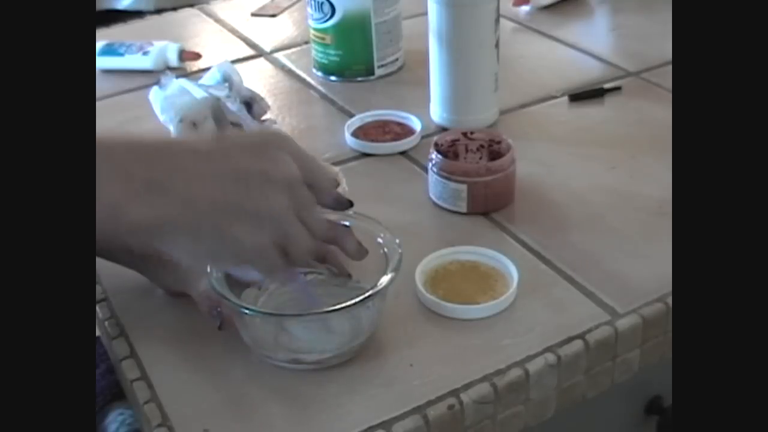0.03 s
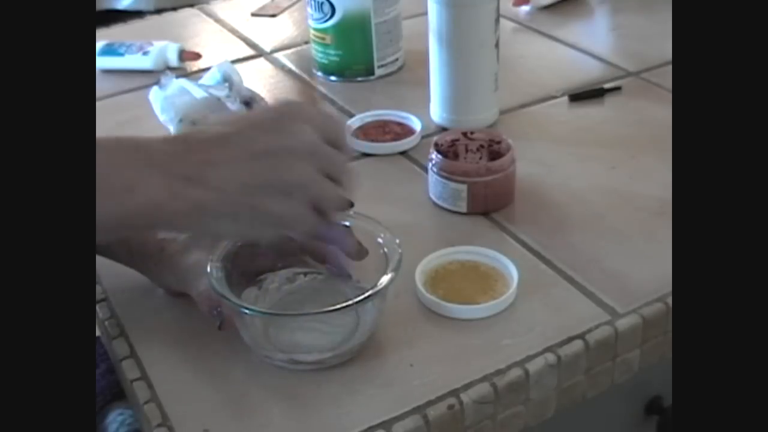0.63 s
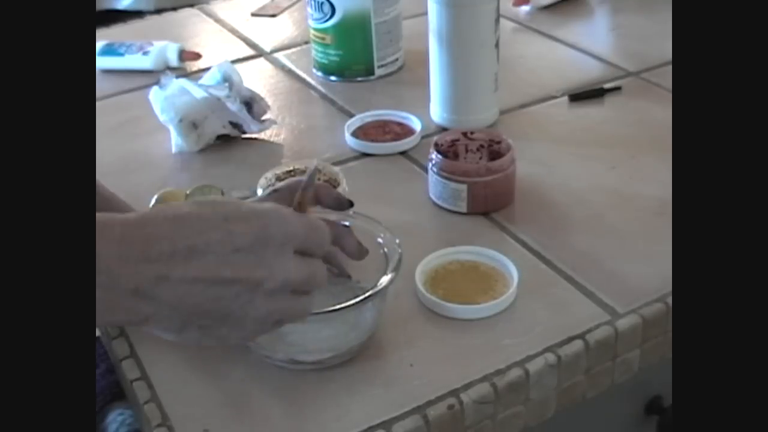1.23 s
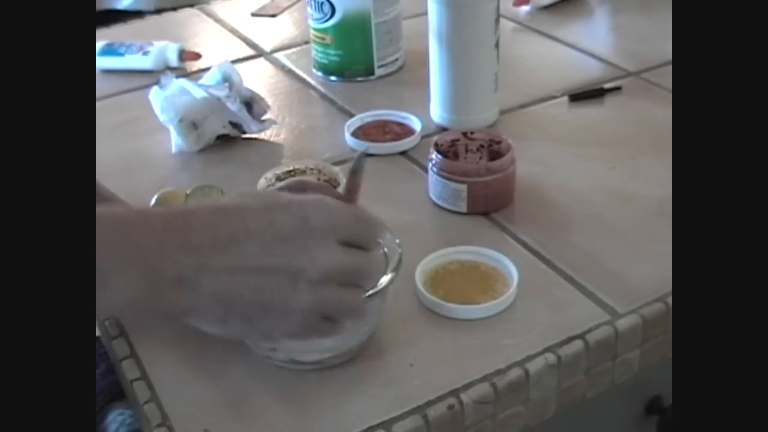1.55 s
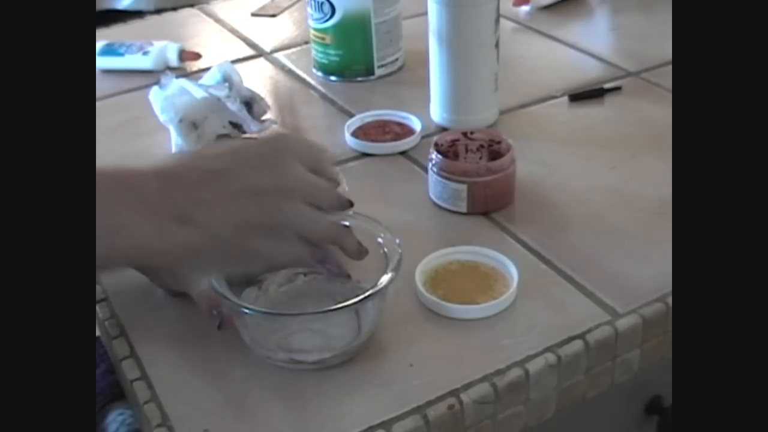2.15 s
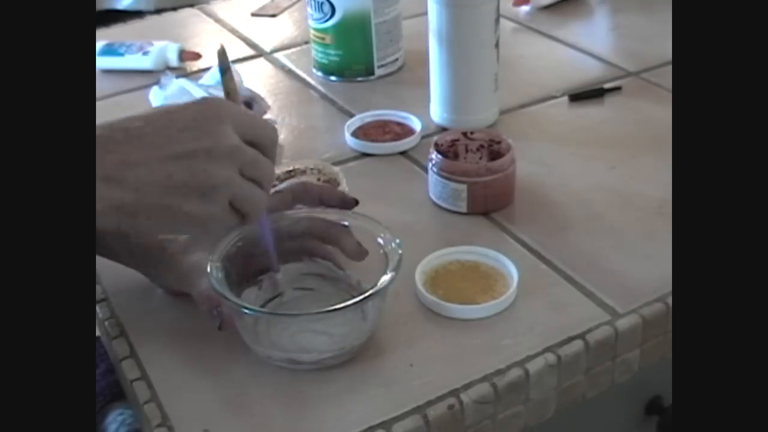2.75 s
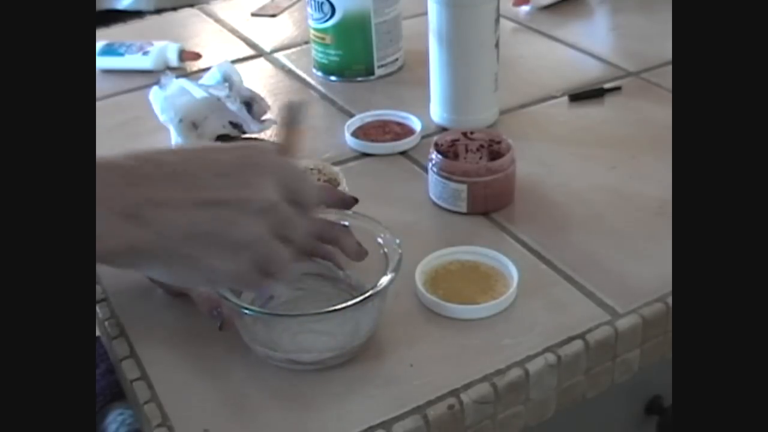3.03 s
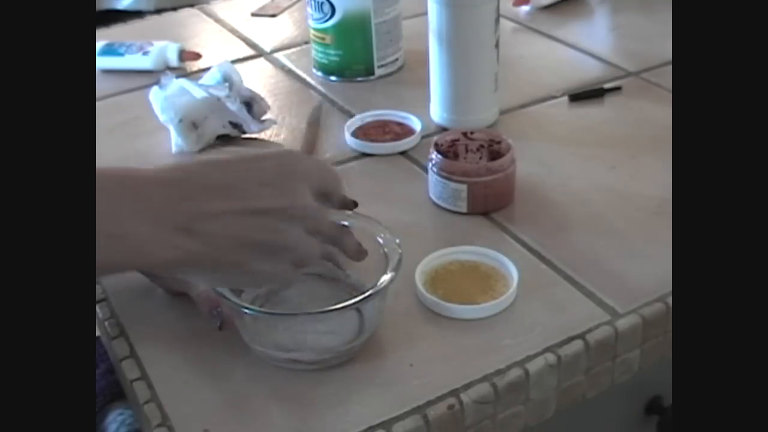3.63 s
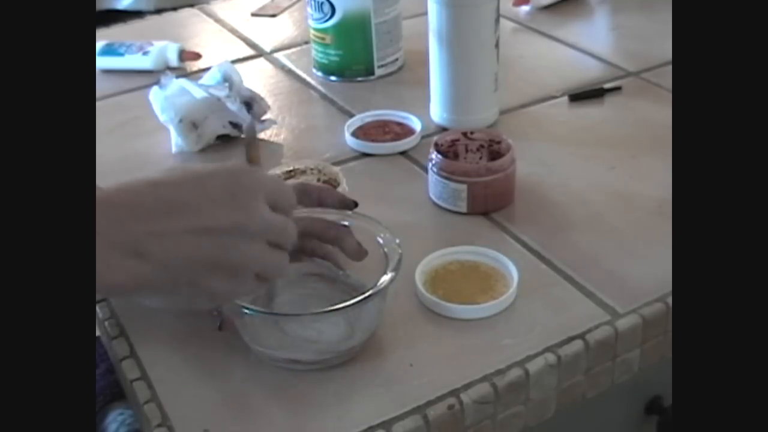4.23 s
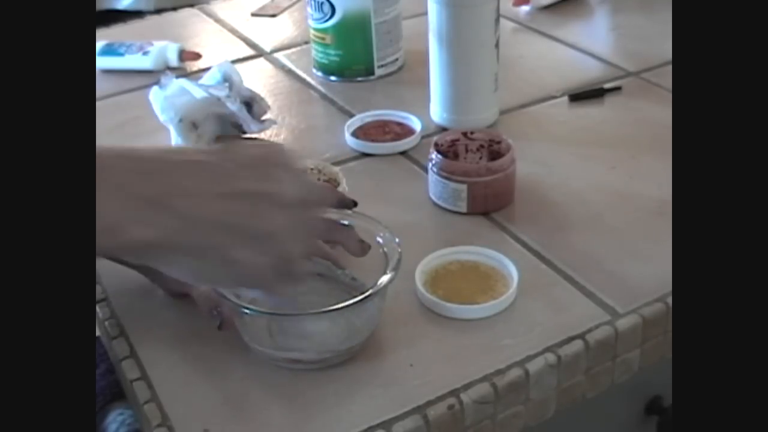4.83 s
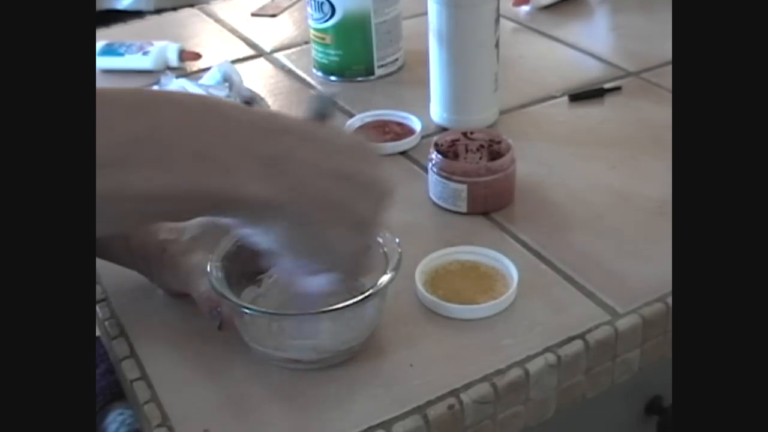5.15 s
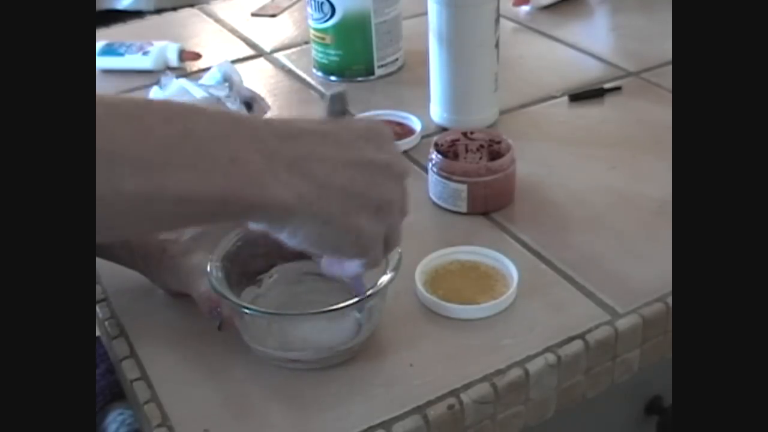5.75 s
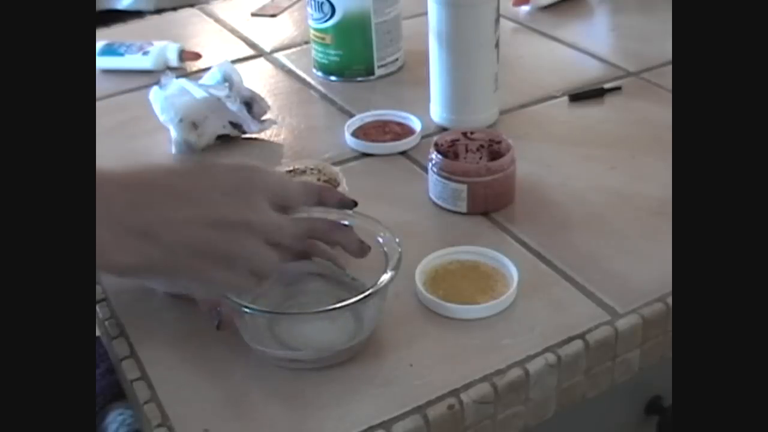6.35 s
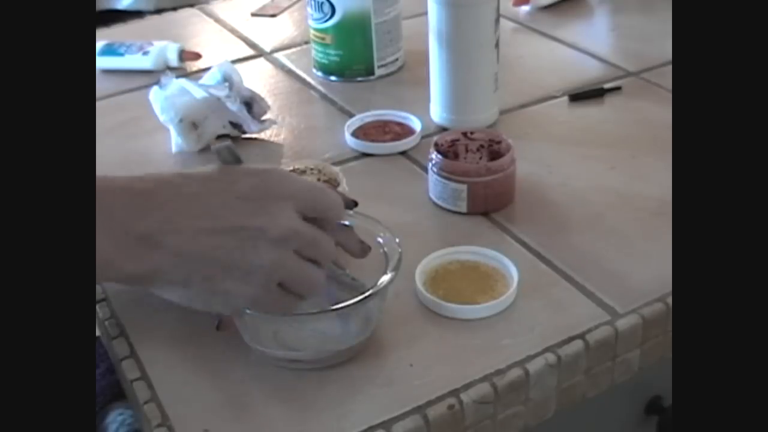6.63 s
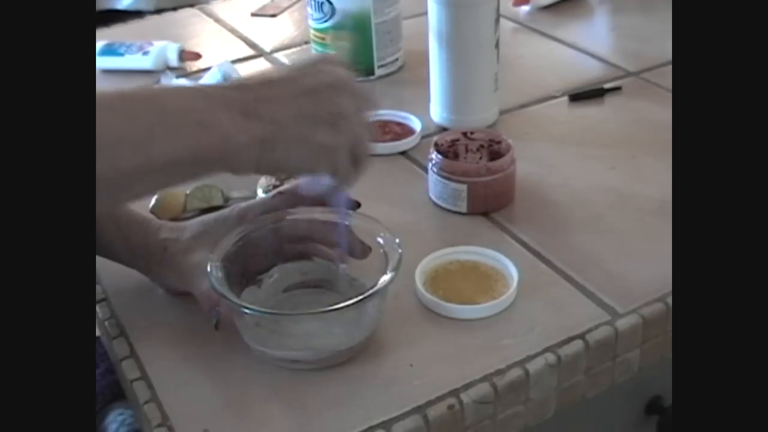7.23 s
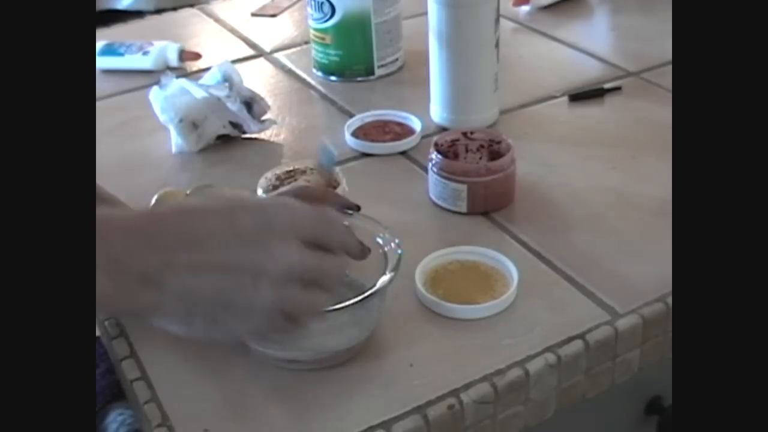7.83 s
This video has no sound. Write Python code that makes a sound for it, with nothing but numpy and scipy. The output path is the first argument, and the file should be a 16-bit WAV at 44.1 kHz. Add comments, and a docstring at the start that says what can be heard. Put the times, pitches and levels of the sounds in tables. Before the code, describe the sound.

Quiet, sticky stirring in a glass bowl that knocks unevenly on a tiled counter, the brush handle rubbing and ticking against the glass.

```python
"""A brush handle stirs thick glue in a small glass bowl held on a tiled counter.
Friction and impacts excite the modes of the bowl: it rocks, knocks dully and skids on the tile,
while the handle rubs, ticks and squeaks on the glass. In the paste, threads snap and air pockets
resonate in pops and smacks. A small hard room reflects it all, over a soft hiss and the thin
whine of a camera motor."""
import sys
import numpy as np
from scipy import signal
from scipy.fft import rfft, irfft, next_fast_len
from scipy.io import wavfile

SR = 44100
rng = np.random.default_rng(int(sys.argv[2]) if len(sys.argv) > 2 else 0)


def wrap_up_sound(samples):
    """Save the sound to the file named by the first command line argument, as 16-bit audio."""
    columns = np.atleast_2d(samples).T
    # keep every value between -1 and 1, then stretch to whole-number steps
    tamed = np.clip(columns, -1, 1)
    steps = np.round(tamed * 32767).astype(np.int16)
    wavfile.write(sys.argv[1], SR, steps)


N = 348390
T = np.arange(N) / SR
ANTIPHASE = np.array([[1], [-1]])   # added on the left, subtracted on the right


def from_db(db):
    """Amplitude ratio of a level in decibels."""
    return 10 ** (np.asarray(db) / 20)


def rms_one(x):
    """Normalisation to unit rms."""
    return x / np.sqrt(np.mean(x ** 2) + 1e-20)


def at_level(sound, db):
    """Normalisation of a transient by the rms of its first 30 ms."""
    head = sound[..., :round(.03 * SR)]
    return from_db(db) * sound / np.sqrt(np.mean(head ** 2) + 1e-20)


def at_hz(points, hz):
    """Interpolation on a logarithmic frequency axis."""
    frequencies, values = np.transpose(points)
    return np.interp(np.log(hz), np.log(frequencies), values)


def add(track, s, sound):
    """Superposition of a sound on a track, starting at s seconds."""
    start = max(round(s * SR), 0)
    track[..., start:start + sound.shape[-1]] += sound[..., :N - start]


def band(x, low_hz, high_hz, order=3):
    """Causal band-pass filtering."""
    edges = [low_hz, min(high_hz, SR / 2 - 1000)]
    return signal.sosfilt(signal.butter(order, edges, "band", fs=SR, output="sos"), x + 1e-18)


def coloured(x, spectrum):
    """Spectral shaping, normalised to unit rms."""
    size = next_fast_len(N)
    hz = np.arange(size // 2 + 1) * SR / size + 1e-3
    shaped = rfft(x, size) * from_db(at_hz(spectrum, hz))
    return rms_one(irfft(shaped, size)[..., :N])


def drift(per_s):
    """Random modulation: straight lines join normally distributed values."""
    return np.interp(T * per_s, np.arange(N // 20), rng.standard_normal(N // 20))


def swell(t, rise_s):
    """Critically damped envelope, peaking at 1 after rise_s."""
    u = t / max(rise_s, .0002)
    return u * np.exp(1 - u)


def grains(per_s, spread_db, size):
    """Shot noise: random impulses of uneven height."""
    heights = from_db(spread_db * np.minimum(rng.exponential(1, size), 4)) * rng.choice([-1, 1], size)
    return heights * (rng.random(size) < per_s / SR)


def now_and_then(per_s):
    """Jittered timing, one event per interval: (time [s], random value [0-1])."""
    offsets, chances = rng.random((100, 2)).T
    times = (np.arange(100) + offsets) / per_s
    return [(s, chance) for s, chance in zip(times, chances) if s < T[-1]]


def ring(force, modes, spread_db=0):
    """Modal superposition: a force drives damped resonators whose gains may vary at random."""
    out = 0
    for hz, db, t60 in modes:
        radius, angle = np.exp(-np.log(1000) / (t60 * SR)), 2 * np.pi * hz / SR
        feedback = [1, -2 * radius * np.cos(angle), radius ** 2]
        gain = from_db(db + spread_db * rng.standard_normal())
        out = out + gain * signal.lfilter([1, 0, -1], feedback, force + 1e-18)
    return out


def diffuse(t, t60, apart_hz):
    """A decaying diffuse field at two close points is coherent only in the bass."""
    mid, side = rng.standard_normal((2, len(t)))
    side = signal.lfilter(*signal.butter(1, apart_hz, "high", fs=SR), side)
    onset = np.clip(t / 0.0023 - .5, 0, 1)
    tail = np.array([mid + side, mid - side]) * np.exp(-np.log(1000) * t / t60) * onset
    return tail / np.linalg.norm(tail[0])


# Modes of bowl and counter together: (frequency [Hz], gain [dB], T60 [s])
BOWL_MODES = [(240.5, -4.5, 0.08), (408.5, -7, 0.057), (479, -10.5, 0.048), (575.5, -6, 0.048),
              (698, -6.5, 0.11), (802.7, 0, 0.094), (838, -8, 0.075), (932.6, -6, 0.1), (1125, 1.5, 0.035),
              (1257, -0.5, 0.033), (1456, -11.5, 0.07), (1557, -9.5, 0.024), (1667, 2, 0.029),
              (1990, -12, 0.041), (2254, -10.5, 0.083)]
BOWL_DETUNE = .022   # scale of the fractional shift in frequency


def loaded_modes():
    """Loading: the shifting grip and paste move each mode of the bowl a little."""
    return [(hz * (1 + BOWL_DETUNE * rng.uniform(-1.7, 1.7)), db, t60) for hz, db, t60 in BOWL_MODES]


# Strength of the stirring: (time [s], level [dB])
EFFORT = [(0.0, -48.5), (0.17, -56.5), (0.31, -54), (1.03, -52), (1.12, -51.5), (1.3, -68), (1.54, -57),
          (1.93, -59.5), (2.18, -55), (2.4, -60), (2.7, -69.5), (2.84, -63.5), (3.45, -63), (3.72, -54),
          (3.87, -51), (4.82, -57), (5.15, -63.5), (5.99, -63), (6.14, -51), (6.25, -49), (6.36, -50),
          (6.91, -53.5), (7.13, -65.5), (7.41, -61.5), (7.57, -43), (7.64, -61), (7.8, -46.5), (7.9, -56)]


def effort(s):
    """The driving level of the hand at a time, in dB."""
    return np.interp(s, *np.transpose(EFFORT))


def rubbing(slips_per_s=600, pops_per_s=110, pop_cycles=14):
    """Frictional excitation: the dragged handle shakes the bowl's modes and frees tiny air pockets."""
    grip = from_db(effort(T) + 1.5 * drift(35))
    slips = np.array([grains(slips_per_s, 3.75, N), grains(slips_per_s, 4.2, N)])
    # Modes come and go as the tip travels, and waver in pitch as the load shifts.
    shaken = sum(ring(slips * from_db(2.0 * drift(22)), [mode]) for mode in BOWL_MODES)
    warped_time = (T + np.cumsum(BOWL_DETUNE * drift(45)) / SR) % T[-1]
    mid = rms_one(band(np.interp(warped_time, T, shaken[0]), 250, 1270))
    side = rms_one(band(np.interp(warped_time, T, shaken[1]), 600, 1270))
    bowl = mid + from_db(-5.5) * side * ANTIPHASE
    pitches = np.geomspace(420, 1450, 14)
    tiny_pops = sum(ring(grains(pops_per_s / len(pitches), 2.6, N), [(hz, 0, pop_cycles / hz)])
                    for hz in pitches)
    return grip * (from_db(-3.5) * bowl + from_db(-9.5) * rms_one(tiny_pops))


def swish(s, usual_db=-66.5, usual_effort_db=-54.5):
    """Power law: the level of the paste follows 0.4 dB for each dB of effort."""
    return usual_db + 0.4 * (effort(s) - usual_effort_db)


def small_pockets(per_s=4.0, low_hz=2200, high_hz=5100, tear_s=0.0042):
    """Cavities of random resonance give faint smacks that grow with the swish; rows as in SMACKS."""
    return [(s, swish(s) - 0.5, low_hz * (high_hz / low_hz) ** chance, tear_s)
            for s, chance in now_and_then(per_s)]


# Colour of the snapping paste: (frequency [Hz], gain [dB])
PASTE_SPECTRUM = [(1200, 18.5), (2000, 1.5), (3000, 5.5), (4200, 2.5), (5100, -1), (6000, 2), (8000, 0),
                  (11000, -11.5), (15000, -6)]
# Large pockets tear from the bristles: (time [s], level [dB], resonance [Hz], rise time [s])
SMACKS = [(0.103, -62, 2520, 0.0045), (0.306, -74, 3900, 0.002), (0.458, -63.5, 4170, 0.0073),
          (0.607, -63, 5000, 0.0088), (0.626, -57.5, 3980, 0.0076), (0.658, -64, 3940, 0.0053),
          (0.675, -61, 2600, 0.0017), (0.775, -63, 5470, 0.0083), (1.065, -61, 5200, 0.0078),
          (2.418, -59, 5300, 0.0061), (2.774, -61, 2430, 0.0073), (3.007, -65, 4570, 0.0034),
          (3.123, -62.5, 3120, 0.011), (3.859, -59.5, 3780, 0.0022), (3.864, -56, 3270, 0.011),
          (3.921, -66, 2550, 0.0042), (4.006, -60.5, 2450, 0.0037), (4.119, -60.5, 5100, 0.007),
          (4.246, -65.5, 3080, 0.0015), (4.456, -59.5, 2550, 0.0056), (4.505, -62, 2620, 0.0028),
          (4.596, -68.5, 2680, 0.0023), (4.843, -62.5, 2300, 0.0052), (5.18, -65.5, 2380, 0.0067),
          (5.343, -65, 3980, 0.0081), (5.368, -64, 2570, 0.0056), (5.681, -63.5, 5060, 0.015),
          (5.757, -64, 3850, .012), (5.83, -67.5, 2500, .005), (6.008, -71, 5200, 0.0047),
          (6.023, -63.5, 2400, 0.0065), (6.16, -63, 2600, .005), (6.502, -61, 2470, 0.0028),
          (6.796, -61, 3700, .006), (6.82, -58, 2500, 0.0034), (7.013, -57, 4230, 0.0055),
          (7.055, -61.5, 4830, 0.0056), (7.455, -54.5, 2400, 0.0088), (7.572, -62, 6000, 0.004),
          (7.697, -61.5, 3650, 0.0049)]


def paste(snaps_per_s=5000, pocket_t60=.004):
    """Rupture noise: sticky threads snap throughout, and in clumps that ring a tearing pocket."""
    snaps = rms_one(grains(snaps_per_s, 5.5, N)) * from_db(swish(T) + 0.5 + 5.5 * drift(30))
    pockets, t = np.zeros(N), T[:SR // 8]
    for s, db, hz, tear_s in SMACKS + small_pockets():
        tearing = grains(snaps_per_s, 7.1, len(t)) * swell(t, tear_s)
        add(snaps, s, at_level(tearing, db))
        add(pockets, s, at_level(ring(tearing, [(hz, 0, pocket_t60)]), db - 1.5))
    return np.std(snaps) * coloured(band(snaps, 1420, 17300, order=2), PASTE_SPECTRUM) + pockets


# Bristles slide on the wet wall: (time [s], relative level [dB])
BRISTLE_LEVEL = [(0.0, -83), (0.9, -75), (1.4, -78), (2.2, -79), (2.55, -76), (3.4, -78), (3.6, -67.5),
                 (4.4, -81), (5.2, -79), (5.75, -74), (5.95, -74), (6.4, -73), (6.95, -70.5), (7.3, -77),
                 (7.9, -72)]


def bristles(slips_per_s=6000, hz=5080, t60=.005):
    """Sliding friction: dense, fine slips drive one damped resonance to a light, narrow hiss."""
    slips = grains(slips_per_s, 4.5, N)
    hiss = rms_one(band(ring(slips, [(hz, 0, t60)]), 4500, 5200, order=2))
    return hiss * from_db(np.interp(T, *np.transpose(BRISTLE_LEVEL)) + 0.5 + 6.5 * drift(25))


# Steady background noise: (frequency [Hz], relative spectral density [dB])
HISS_SPECTRUM = [(12, 3.5), (20, 6), (245, 0.5), (465, 3), (581, 0), (725, 1.5), (932, -13.5), (1380, -4.5),
                 (1500, -7.5), (2680, -5), (2920, -12.5), (3540, -6.5), (4700, -13.5), (5100, -12.5),
                 (5500, -12.5), (9930, -8.5), (15500, -20)]
# Likeness of left and right, which shapes the antiphase noise: (frequency [Hz], likeness [0-1])
HISS_LIKENESS = [(30, 1), (100, 1), (500, 0.073), (1500, 0.66), (5000, 0.66), (14000, 0.96)]


def hiss(level_db=-63.0, side_db=3.5):
    """Partial coherence: room air and microphone hiss sum an in-phase and an antiphase noise."""
    mid, side = rng.standard_normal((2, N))
    side_spectrum = []
    for hz, db in HISS_SPECTRUM:
        likeness = np.clip(at_hz(HISS_LIKENESS, hz), 0, .98)
        side_spectrum.append((hz, db + 10 * np.log10((1 - likeness) / (1 + likeness))))
    side = from_db(side_db) * coloured(side, side_spectrum)
    return from_db(level_db) * (coloured(mid, HISS_SPECTRUM) + side * ANTIPHASE)


# Tones of the camera motor: (frequency [Hz])
WHINE_HZ = [2929, 6385, 7152, 8966, 9076, 9728, 9920, 10006]
# One row per tone: (left level [dB], right level [dB], phase lag of the right [rad], waver [rad])
WHINE_TONES = [(-74.5, -80, -2, 0.43), (-100, -77, 0, 1.2), (-71, -76, -0.5, 1.1), (-75, -80, 2.5, .7),
               (-70, -76.5, 3.5, 1.4), (-73.5, -82, 3, 1.3), (-75, -81, -0.5, 1.2), (-73.5, -79.5, 2, 0.77)]
# Swell of the lowest tone: (time [s], gain [dB])
WHINE_SWELL = [(0.0, -1), (0.45, -7), (1.2, -4), (1.45, 2.5), (1.85, 5), (2.4, 5), (2.9, 2), (3.35, -3),
               (3.6, 4), (4.65, 0), (5.1, 4), (5.45, 5), (5.8, 3), (6.1, 6.5), (6.8, -1), (7.25, 7),
               (7.9, -2)]


def motor_whine(gain_db=0.5, flicker_db=3.0):
    """A line spectrum: the motor's tones waver under random phase and amplitude modulation."""
    out = np.zeros((2, N))
    for hz, (left_db, right_db, lag, waver) in zip(WHINE_HZ, WHINE_TONES):
        phase = 2 * np.pi * hz * T + waver * drift(70) + 2 * drift(19)
        db = gain_db + flicker_db * drift(30)
        if hz == WHINE_HZ[0]:
            db += np.interp(T, *np.transpose(WHINE_SWELL))
        out += np.sqrt(2) * from_db([db + left_db, db + right_db]) * np.sin([phase, phase - lag])
    return out


# Air pockets open under the bristles: (time [s], frequency [Hz], level [dB])
POPS = [(0.036, 618, -55), (0.106, 1200, -53), (0.688, 588, -53), (1.008, 1276, -54), (1.066, 1200, -50),
        (1.111, 970, -50), (1.245, 796, -50), (1.908, 1190, -61), (1.987, 414, -54.5), (2.18, 760, -36.5),
        (2.251, 847, -43.5), (3.656, 465, -52), (3.812, 426, -57), (3.938, 448, -61.5), (4.055, 411, -54),
        (4.201, 1160, -58), (4.282, 393, -59), (4.411, 1274, -53.5), (4.509, 1480, -59.5),
        (4.543, 734, -55), (4.597, 419, -54), (4.87, 1330, -51.5), (5.018, 626, -53.5), (5.43, 1130, -59),
        (5.94, 1136, -56.5), (6.645, 1247, -48), (6.763, 723, -53), (6.803, 412, -48.5), (6.914, 1194, -53),
        (6.979, 1183, -40.5)]


def pops(rise_cycles=4.8, sag=0.07, sag_s=0.02, jitter=0.063):
    """Cavity resonance: a round, wet tone swells and dies, sagging in pitch as the pocket widens."""
    out, t = np.zeros(N), T[:SR // 8]
    for s, hz, db in POPS:
        pitch = hz * (1 + sag * (np.exp(-t / sag_s) - .5) + jitter * drift(290)[:len(t)])
        tone = np.sin(2 * np.pi * np.cumsum(pitch) / SR)
        add(out, s, at_level(tone * swell(t, rise_cycles / hz), db))
    return out


def plop(t, hz, rise_s, fall=.5, fall_s=0.00771, ring_s=0.017):
    """A damped chirp: a short, wet plop that falls quickly in pitch with each knock."""
    pitch = hz * (1 - fall * (1 - np.exp(-t / fall_s)))
    tone = np.sin(2 * np.pi * np.cumsum(pitch) / SR)
    attack = 1 - np.exp(-t / max(0.031 * rise_s, .0002))
    return tone * attack * np.exp(-t / (ring_s + rise_s / 2))


def wobbles(per_s=2.7, thud_db=-4, rise_s=0.002):
    """Forced rocking: slight knocks that grow with the effort; rows as in KNOCKS."""
    return [(s, effort(s) - 3, thud_db + 1.5 * (chance - .5), rise_s)
            for s, chance in now_and_then(per_s)]


# The bowl rocks on the tile: (time [s], level [dB], thud [dB re level], contact rise time [s])
KNOCKS = [(0.074, -43, -3.5, 0.0007), (0.165, -38.5, -6.5, 0.00099), (0.271, -46, 1, 0.0028),
          (0.371, -51.5, -1, 0.0015), (0.469, -51, -6.5, 0.017), (0.768, -54.5, -8, 0.0058),
          (0.843, -50.5, -8.5, 0.0012), (0.896, -46.5, -2, 0.0086), (0.907, -43, -4.5, 0.00022),
          (1.008, -46, -4.5, 0.0044), (1.111, -50.5, -14, 0.0067), (1.3005, -41, -15, 0.00017),
          (1.54, -48, -0.5, 0.00018), (1.606, -46.5, 6.5, 0.0025), (1.8255, -45, -14.5, 0.00015),
          (1.96, -50.5, -7.5, 0.0025), (2.02, -36, -4, 0.0028), (2.055, -46, -1, .001),
          (2.119, -47, 0, 0.00034), (2.169, -31.5, -12, 0.00012), (2.276, -43, -7, 0.001),
          (2.608, -42.5, -5, 0.0014), (2.745, -55.5, 4, .0015), (2.864, -61, -9.5, 0.00091),
          (2.944, -49.5, -3, 0.0016), (3.003, -52.5, -12, 0.0033), (3.092, -50.5, 1.5, 0.0036),
          (3.332, -55, 4.5, 0.0044), (3.648, -51, -4.5, 0.0019), (3.986, -48, -12, 0.0023),
          (4.112, -47, -3, 0.0074), (4.285, -52.5, -5, 0.019), (4.35, -51, -4, 0.0071),
          (4.408, -50, -15.5, 0.0012), (4.506, -54, -3, 0.0027), (4.543, -50, -13.5, 0.00044),
          (4.593, -50, -2, 0.0018), (4.751, -47.5, -15, 0.0003), (4.825, -48.5, -8, 0.0022),
          (4.846, -48, -10, 0.0017), (4.891, -48, -3, 0.0018), (5.0095, -47.5, -8, 0.0023),
          (5.938, -60.5, -13.5, 0.0011), (6.069, -51.5, -19.5, 0.00028), (6.118, -52.5, -1, 0.0026),
          (6.23, -48.5, 5.5, 0.00055), (6.3065, -36.5, -5, 0.00047), (6.351, -41, -2.5, 0.0077),
          (6.474, -39.5, -3, 0.0034), (6.55, -51.5, -10.5, 0.0017), (6.681, -49, -7, 0.0017),
          (6.644, -43, -15, 0.0002), (6.759, -46, -8.5, 0.00029), (6.802, -46, -4.5, 0.0068),
          (6.9795, -43, -12.5, 0.00012), (7.014, -43, -12.5, 0.015), (7.165, -50.5, -5, 0.0041),
          (7.375, -35, -6, 0.0061), (7.4088, -26.5, -15, 0.00097), (7.416, -30.5, -15, 0.00084),
          (7.429, -29, -14, 0.00037), (7.445, -38, -11, .001), (7.482, -33.5, -7.5, 0.011),
          (7.5165, -26, -13.5, 0.0016), (7.53, -33, -12.5, 0.00039), (7.641, -49.5, -5, 0.00036),
          (7.778, -47, -15, 0.0075), (7.7955, -33.5, -8, 0.0013), (7.806, -35.5, -14.5, 0.0015)]


def knocks(usual_db=-42.5, thud_lag_s=0.0009):
    """Impact excitation: the foot lands and rings bowl and counter; a stronger blow is brighter."""
    out, t = np.zeros((2, N)), T[:SR // 5]
    for s, db, thud_db, rise_s in list(KNOCKS) + wobbles():
        excess_db = db - usual_db
        edge_db = -9.0 + 0.19 * excess_db
        contact = rng.standard_normal(len(t)) * swell(t, rise_s)
        force = contact / np.linalg.norm(contact) + diffuse(t, t60=0.11, apart_hz=1010)
        bowl = ring(force, loaded_modes(), spread_db=2.5)
        plop_hz = 1480 * 2 ** ((edge_db - thud_db) / 45)   # higher with a harder knock
        counter = band(force, 189, 275, order=2) * np.exp(-t / 0.03)
        thud = band(bowl, 302, 655)
        body = band(bowl, 633, 1300)
        edge = band(band(bowl, 1120, 5800), 1156, 1800, order=1) * np.exp(-t / 0.4)
        add(out, s, at_level(plop(t, plop_hz, rise_s), usual_db + 0.87 * excess_db - 7.0))
        add(out, s, at_level(counter, db - 23.0))
        add(out, s + thud_lag_s, at_level(thud, db + thud_db))
        add(out, s, at_level(body, db + 0.5))
        add(out, s, at_level(edge, db + edge_db))
    return out


# Modes of the glass wall, damped by the hand: (frequency [Hz], gain [dB], T60 [s])
GLASS_MODES = [(1644, 7.5, 0.094), (2040, -18, 0.045), (2420, -14, 0.037), (3720, -9, 0.027),
               (4270, 0, 0.071), (4760, -5.5, 0.024), (5100, -6.5, 0.014), (6440, 6, 0.0071),
               (6860, -12, 0.029), (7640, 4.5, 0.11), (11650, -11, .025)]
# The handle taps the glass: (time [s], level [dB], middle band gain [dB], top band gain [dB],
# freedom to ring [0-1], clack frequency [Hz], clack gain [dB])
TICKS = [(0.651, -50, 7, -16, 0.65, 4120, 8.5), (0.897, -45.5, -18, -18, 0.9, 2200, -6),
         (1.3011, -48, -3.5, -11, 0.35, 2660, 0), (1.603, -32.5, 1, -11, 0.47, 1930, -7),
         (2.1696, -50, -12, -25, 0.26, 1350, 8), (2.6021, -43.5, 5, -24, 0.87, 1940, -3),
         (3.247, -37, 0, -10, 0.47, 2140, -2), (3.476, -49, -2, -9, 0.62, 2970, 1),
         (3.682, -40.5, -6.5, -19, 0.9, 1660, -13), (4.75, -60, 5, -14, 0.25, 2590, 4),
         (6.293, -43, 5.5, -13, 0.8, 2150, -4), (6.6468, -53, 1, -17, 0.36, 2450, 9),
         (7.011, -55, -13, -3, 0.3, 2430, 8.5), (7.167, -51.5, 5, -6, 0.26, 2460, 6.5),
         (7.386, -48.5, 7, -7, 0.55, 2430, -7), (7.487, -50.5, -8, -2.5, 0.3, 2700, -8),
         (7.6403, -54.5, 6, -2, 0.3, 2440, 12.5), (7.695, -56, 6, 2, 0.1, 1180, 13),
         (7.751, -59, 4, -8, 0.1, 1290, 6), (7.801, -53.5, 8, 3.5, 0.25, 2370, 5)]


def ticks(detune=0.0067, touch_s=0.00067, clack_t60=0.011):
    """Contact damping: a tap rings handle and glass, but the glass only clicks if pressed on."""
    out, t = np.zeros((2, N)), T[:SR // 6]
    for s, db, middle_db, top_db, freedom, clack_hz, clack_db in TICKS:
        decay_scale = np.clip(freedom, .15, 1) ** 2
        modes = [(hz * (1 + detune * rng.standard_normal()), mode_db, t60 * decay_scale)
                 for hz, mode_db, t60 in GLASS_MODES]
        # The tip skids as it lands, more when it is pressed.
        skid = 0.22 * (1.1 - freedom) * rng.standard_normal(len(t)) * swell(t, touch_s)
        force = signal.unit_impulse(len(t)) + skid + diffuse(t, t60=0.088, apart_hz=900)
        glass = ring(force, modes, spread_db=3.0)
        handle = ring(force, [(clack_hz, 0, clack_t60)])
        clack = band(handle, clack_hz / 2, clack_hz * 2, order=2) * np.exp(-t / 0.068)
        add(out, s, at_level(clack, db + clack_db - 5.5))
        add(out, s, at_level(band(glass, 1160, 3300), db - 2.0))
        add(out, s, at_level(band(glass, 3800, 5400), db + middle_db - 8.5))
        add(out, s, at_level(band(glass, 7070, 20000), db + top_db - 6.0))
    return out


# Single threads of glue break: (time [s], relative level [dB])
THREAD_SNAPS = [(1.068, -35), (2.142, -35), (2.2747, -31), (2.4194, -33), (3.713, -35), (3.7848, -27),
                (3.9225, -35), (7.0165, -39), (7.4664, -39), (7.6954, -32)]


def thread_snaps():
    """Sudden release of tension: each thread gives one impulse, heard as a fine, bright tick."""
    impulses = np.zeros(N)
    for s, db in THREAD_SNAPS:
        impulses[int(s * SR)] = from_db(db + 1.0)
    return band(impulses, 9000, 15500, order=2)


# The handle squeaks on wet glass:
# (time [s], duration [s], frequency [Hz], level [dB], overtones [dB re level], roughness [0-1])
SQUEAKS = [(3.7325, 0.021, 920, -26.5, -21.5, 0.32), (3.752, 0.047, 907, -43, -13, 0.5),
           (3.861, 0.028, 918, -37, -24, 0.77), (3.887, 0.051, 884, -49.5, -18, 0.82),
           (6.286, 0.036, 1622, -38, -20, 0.4)]


def squeaks(glide=0.057, jitter=0.15, rasp_rad=0.43, flutter=0.96):
    """Stick-slip oscillation: a slightly falling, raspy tone that stutters and blurs when rough."""
    out = np.zeros(N)
    for s, length_s, hz, db, overtones_db, roughness in SQUEAKS:
        size = round(length_s * SR)
        progress = np.linspace(0, 1, size)
        pitch = hz * (1 - glide * (progress - .5) + jitter * roughness * drift(567)[:size])
        phase = 2 * np.pi * np.cumsum(pitch) / SR
        overtones = sum(np.sin(k * (phase + rasp_rad * drift(724)[:size])) / (k - 1) ** 2
                        for k in range(2, 5))
        tone = np.sin(phase) + from_db(overtones_db) * overtones
        stutter = rms_one(1 + flutter * roughness * drift(350)[:size])
        arch = np.sqrt(np.abs(np.sin(np.pi * progress)))
        add(out, s, from_db(db) * tone * stutter * arch)
    return out


# The bowl skids after a heavy knock: (time [s], level [dB], rise time [s], decay time [s])
SKIDS = [(7.374, -39.5, 0.0011, 0.035), (7.412, -31.5, 0.0021, 0.022), (7.521, -39, 0.0022, 0.039),
         (7.796, -45.5, 0.0024, 0.023)]


def skids(slips_per_s=1500, grit_db=-11.0):
    """Dry friction: gritty slips on the tile shake the bowl's modes and rasp until it comes to rest."""
    out, t = np.zeros((2, N)), T[:SR // 3]
    for s, db, rise_s, decay_s in SKIDS:
        attack, decay = 1 - np.exp(-t / rise_s), np.exp(-t / decay_s)
        slips = np.array([grains(slips_per_s, 3.0, len(t)) for _ in range(3)]) * attack * decay
        force = slips[0] + .5 * slips[1:]   # partly alike on the two sides
        bowl = band(ring(force, loaded_modes()), 317, 2250, order=2)
        grit = band(force, 1500, 2700, order=4) * decay
        add(out, s, at_level(bowl, db))
        add(out, s, at_level(grit, db + grit_db))
    return out


# Reflections from nearby hard surfaces: (delay [s], left gain [dB], right gain [dB])
REFLECTIONS = [(.0066, -48, -28.5), (0.0098, -28, -12.5), (0.0156, -38, -18)]


def room(x, tail_db, tail_t60):
    """Convolution with an impulse response: direct sound, early reflections and a diffuse tail."""
    response = from_db(tail_db) * diffuse(T[:SR // 2], tail_t60, apart_hz=600)
    response[:, 0] += 1
    for delay_s, left_db, right_db in REFLECTIONS:
        response[:, round(delay_s * SR)] += from_db([left_db, right_db])
    return signal.fftconvolve(np.atleast_2d(x), response, axes=1)[:, :N]


def placed(x, left_db, lag_s):
    """Localisation by level and time: the left is left_db above the right, which lags by lag_s."""
    left = x[0] * from_db(left_db / 2)
    right = np.interp(T - lag_s, T, x[1]) * from_db(-left_db / 2)
    return np.array([left, right])


def scene():
    """Superposition: bowl, glass and glue reverberate in the room, over the hiss and the whine."""
    bowl = room(knocks() + skids() + rubbing() + squeaks() + pops(), tail_db=-9.5, tail_t60=0.27)
    bowl += 0.28 * band(bowl, 1010, 2130, order=1) * ANTIPHASE   # upper modes radiate to the left
    glass = room(ticks(), tail_db=-12.0, tail_t60=0.22)
    glue = room(paste() + bristles() + thread_snaps(), tail_db=-1.0, tail_t60=0.056)
    return (placed(bowl, left_db=-0.2, lag_s=.00002)
            + placed(glass, left_db=1.5, lag_s=.000023)
            + placed(glue, left_db=-1.0, lag_s=.000023)
            + hiss() + motor_whine())


def record(dry):
    """Band limiting: a steep elliptic low-pass removes the treble above 15.3 kHz."""
    return signal.sosfilt(signal.ellip(10, .1, 70, 15300, fs=SR, output="sos"), dry)


dry = scene()
out = record(dry)
wrap_up_sound(out)
```